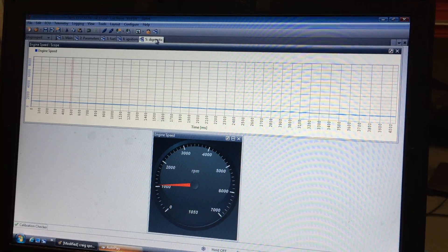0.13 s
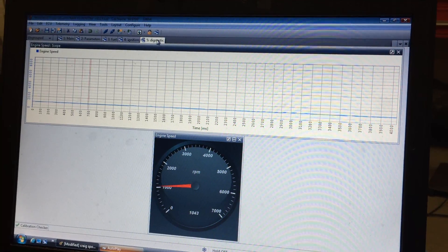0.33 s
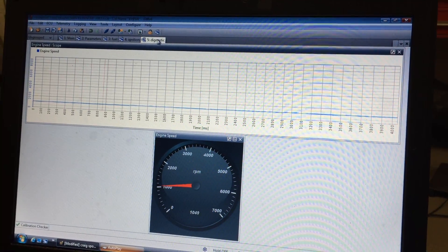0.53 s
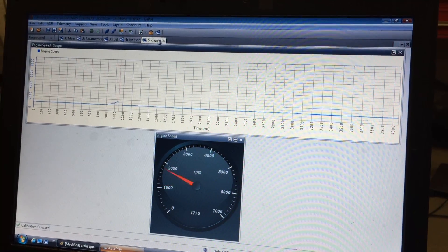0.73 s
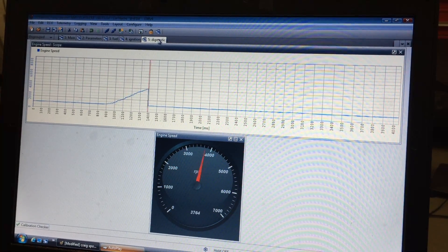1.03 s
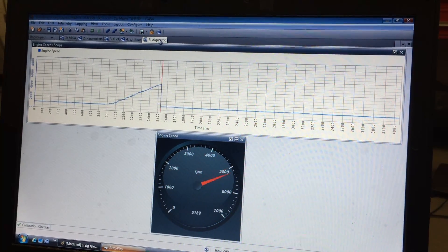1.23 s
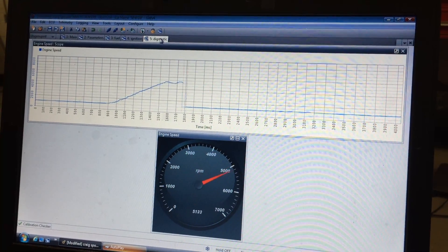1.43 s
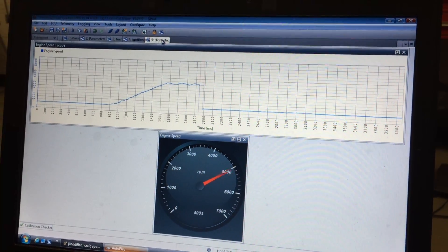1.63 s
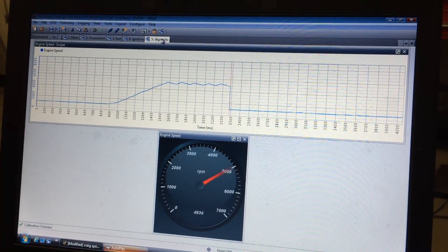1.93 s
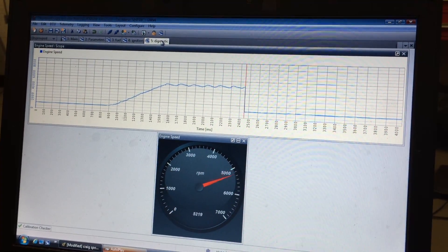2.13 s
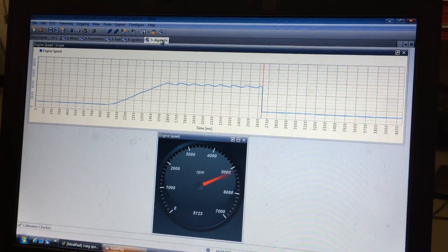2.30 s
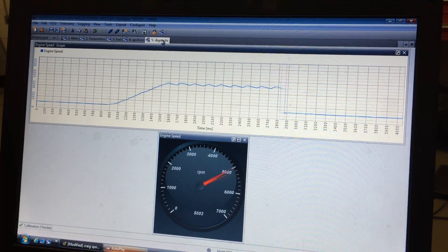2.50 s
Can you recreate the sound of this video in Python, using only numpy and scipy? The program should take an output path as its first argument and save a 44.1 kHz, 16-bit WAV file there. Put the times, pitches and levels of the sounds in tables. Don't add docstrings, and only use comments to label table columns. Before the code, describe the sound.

Car engine on a bench idles briefly, climbs to a howling roar, and bounces rapidly off the limiter.

```python
import sys
import numpy as np
from scipy import signal
from scipy.fft import rfft, irfft, next_fast_len
from scipy.io import wavfile
from scipy.ndimage import uniform_filter1d

SR = 44100
rng = np.random.default_rng(int(sys.argv[2]) if len(sys.argv) > 2 else 0)


def persist_wave(psi):
    counts = np.round(np.clip(psi, -1, 1) * 32767).astype(np.int16)
    wavfile.write(sys.argv[1], SR, np.atleast_2d(counts).T)


def invert_db(x):
    u = np.asarray(x, float) / 20
    return 10 ** u


N = 117306

# (time [s], firing rate [Hz], firing strength [dB], pipe roar [dB], clatter [dB])
ENGINE_RUN = [(.09, 35.97, -26, -47, -38), (.4, 35.55, -27, -66, -39), (.47, 34.86, -30, -49.5, -39),
              (0.551, 35.31, -27.5, -64, -37), (0.646, 35.11, -26.5, -33.5, -38.5),
              (0.689, 40, -23.5, -31.5, -36), (.755, 51.96, -16.5, -26, -38.5),
              (0.811, 60.97, -24, -26, -37.5), (0.865, 71.57, -16, -26, -38),
              (0.931, 85.2, -22.5, -22, -39), (1.019, 112.7, -14.5, -25, -38.5),
              (1.07, 123.7, -22.5, -30.5, -40.5), (1.107, 132.7, -17.5, -19, -37),
              (1.182, 145.4, -19, -30.5, -35), (1.262, 162, -16.5, -29, -34),
              (1.33, 170, -13, -23.5, -33.5), (1.422, 171, -15.5, -24.5, -32.5),
              (2.66, 171, -17, -24.5, -33)]
# (centre time [s], length [s], level [dB])
LIMITER_BURSTS = [
    (1.304, .05, -2),
    (1.406, 0.079, -1),
    (1.554, 0.073, 0),
    (1.709, .08, -0.5),
    (1.862, 0.091, -1.5),
    (2.007, 0.08, 0),
    (2.157, .07, 0),
    (2.301, .075, -2),
    (2.453, 0.1, -0.5),
    (2.595, .08, 0.5),
]
# (frequency [Hz], width [Hz], level [dB])
PIPE_MODES = [(53.3, 5.3, -4), (75.6, 6.9, 5.5), (122.6, 25, 4), (177.7, 23.7, 10), (215.4, 9.6, 14),
              (290, 8.3, -4), (345.2, 37, -13.5), (370.5, 72, -8), (509, 12, 6), (544, 9.9, 8.5),
              (543, 45, -5), (623, 20, -4.5)]
# (frequency [Hz], width [Hz], level [dB])
ROAR_MODES = [(541.5, 21, 10.5), (566.6, 54, 5), (640, 53, 1.5), (497, 75, 3.5), (798, 150, -15),
              (1080, 30, -24.5), (1130, 51, -11), (1453, 72, 0), (2356, 220, -13)]
# (frequency [Hz], width [Hz], level re firing strength [dB])
RUMBLE_MODES = [(50.5, 43, -22.5), (69.4, 54, -9.5), (124.3, 37, -4.5), (173, 36, -7.5), (224.4, 12, -1),
                (324, 37, -10.5), (394, 41, -13.5)]
# (time [s], level [dB])
RASP_EVENTS = [(.74, -27.5), (.84, -31), (.889, -42), (.98, -40), (1.101, -31), (1.331, -20), (1.474, -19),
               (1.62, -24), (1.765, -21.5), (1.946, -28), (2.07, -25), (2.209, -24), (2.36, -22),
               (2.514, -24)]
# (frequency [Hz], density [dB per Hz])
IDLE_CLATTER = [(150, -43), (250, -4), (297, -30.5), (574, -13), (771, -15), (1030, -16.5), (1370, -18.5),
                (2730, -23.5), (15700, -50.5)]
# (frequency [Hz], density [dB per Hz])
FAST_CLATTER = [(410, -60), (700, -4.5), (1260, -5), (1490, -2.5), (1830, -6), (2320, -7), (2890, -11.5),
                (6310, -17.5), (15700, -31)]
# (frequency [Hz], gain [dB])
MIC_RESPONSE = [(3600, -0.5), (4300, 1), (4950, -1.5), (5600, 1), (9600, 1), (10500, 0), (11400, 3),
                (15000, 3)]

T = np.arange(N) / SR


def engine_run():
    limit_s, edge_s = 1.3, .035
    bounce_hz, bounce_lag_s, jitter = 3.5, .035, .003
    times, *columns = np.transpose(ENGINE_RUN)
    rate, fire_db, roar_db, clatter_db = (np.interp(T, times, column) for column in columns)
    fuel_on = np.zeros(N)
    for centre, length, db in LIMITER_BURSTS:
        fuel_on += invert_db(db) * np.clip((length / 2 - abs(T - centre)) / edge_s + .5, 0, 1)
    before_limit = np.clip((limit_s - .04 - T) / edge_s, 0, 1)
    fuel_on = np.maximum(fuel_on, before_limit)
    lagged = uniform_filter1d(np.interp(T - bounce_lag_s, T, fuel_on), size=SR // 25)
    rate = (rate - bounce_hz * (1 - lagged)) * (1 + jitter * drift(30))
    return rate, np.cumsum(rate) / SR, fuel_on, fire_db, roar_db, clatter_db


def firing_orders(rate, turns, fuel_on, fire_db, roar_db):
    catch_hz, catch_s, cut_db = 9, .04, -15
    pulse_db_per_oct, uneven_db, sub_db = -4, -19, -6.5
    upper_hz, upper_db = 393, 5.5
    muffler_hz, muffler_width_hz, muffler_db = 332, 84, -4.5
    wobble_db, settled = 3, .3
    phase = rng.random(64)
    caught = uniform_filter1d(np.interp(T - catch_s, T, fuel_on), size=SR // 20)
    slip = np.cumsum(catch_hz * (1 - caught)) / SR
    steady = 1 - (1 - settled) * np.clip((rate - 50) / 50, 0, 1)
    tones = np.zeros(N)
    for k in range(1, 64):
        order, whole = k / 4, k % 4 == 0
        hz = order * rate
        upper = np.clip((hz - upper_hz) / 60 + .5, 0, 1)
        db = fire_db + upper * (roar_db + upper_db - fire_db)
        if not whole:
            db = db + uneven_db + sub_db * (k < 4)
        wobble = wobble_db * (steady if whole and k != 8 else 1)
        db = db + pulse_db_per_oct * np.log2(hz / 100) + wobble * drift(20 + k)
        db = db + muffler_db * np.exp(-((hz - muffler_hz) / muffler_width_hz) ** 2)
        cycles = order * turns + phase[k]
        fuel = 1
        if k == 4:
            cycles = cycles - slip
            fuel = invert_db(cut_db) + (1 - invert_db(cut_db)) * fuel_on
        fade = np.clip((900 - hz) / 100, 0, 1)
        tones += fuel * fade * invert_db(db) * np.cos(2 * np.pi * cycles)
    return pipe(tones, PIPE_MODES, flip=0.99)


def exhaust_roar(turns, roar_db):
    puff = .5 + np.exp(-(turns % 1) / 0.17)
    puffs = evened(puff * rng.standard_normal(N))
    return invert_db(roar_db) * evened(pipe(puffs, ROAR_MODES))


def rasps():
    rasp_s, rasp_hz = .006, 1900
    shape = np.zeros(N)
    for start, db in RASP_EVENTS:
        length = rasp_s * np.where(T > start, 1.6, .6)
        shape += invert_db(db) * np.exp(-((T - start) / length) ** 2)
    band = signal.butter(3, [rasp_hz * 0.58, rasp_hz * 1.464], "bandpass", fs=SR, output="sos")
    grains = rng.standard_normal(N) * invert_db(2.5 * drift(600))
    return shape * evened(signal.sosfilt(band, grains))


def howl():
    howl_hz, howl_db, start_s, end_s = 533, -23, 0.757, 1.195
    gate = np.clip((T - start_s) / 0.064, 0, 1) * np.clip((end_s - T) / 0.24, 0, 1)
    cycles = np.cumsum(howl_hz * (1 + .008 * drift(40))) / SR
    return gate * invert_db(howl_db + 1.9 * drift(55)) * np.sqrt(2) * np.cos(2 * np.pi * cycles)


def clatter(rate, clatter_db):
    frames, hz = N // 128 + 5, np.fft.rfftfreq(512, 1 / SR)
    real, imag, patches = rng.standard_normal((frames, 257, 3)).T
    patches = uniform_filter1d(patches, size=6, axis=0)
    patches = evened(uniform_filter1d(patches, size=8, axis=1))
    at = np.clip(np.arange(frames) * 128, 0, N - 1)
    fast = np.clip((rate[at] - 35) / 130, 0, 1)

    def levelled(points):
        db = read(points, hz)
        return (db - 10 * np.log10(np.sum(invert_db(2 * db[hz > 2500]))))[:, None]

    db = levelled(IDLE_CLATTER) * (1 - fast) + levelled(FAST_CLATTER) * fast
    db = db + 0.76 * patches + 0.38 * drift(33)[at]
    noise = signal.istft((real + 1j * imag) * invert_db(db), nperseg=512, noverlap=384)[1][:N]
    return invert_db(clatter_db + 3.5) * noise


def intake():
    open_s, rise_s, shut_s, fall_s = .66, .1, .97, .2
    gate = np.clip((T - open_s) / rise_s, 0, 1) * np.clip((shut_s - T) / fall_s + .5, 0, 1)
    high = signal.butter(2, 7000, "highpass", fs=SR, output="sos")
    air = evened(signal.sosfilt(high, rng.standard_normal(N)))
    return invert_db(-44.5 + 1.4 * drift(40)) * gate * air


def rumble(rate, fire_db):
    db = 3.5 + fire_db - 5 * np.log2(rate / 70)
    return invert_db(db) * pipe(10 * rng.standard_normal(N), RUMBLE_MODES)


def pipe(x, modes, flip=-1):
    out = np.zeros(N)
    for k, (hz, width, db) in enumerate(modes):
        r = np.exp(-np.pi * width / SR)
        ring = signal.lfilter([1 - r], [1, -r * np.exp(2j * np.pi * hz / SR)], x)
        out += flip ** k * invert_db(db) * 2 * ring.real
    return out


def drift(rate_hz):
    size = max(int(SR / rate_hz), 2)
    smooth = uniform_filter1d(rng.standard_normal(N), size)
    return evened(uniform_filter1d(smooth, size))


def evened(x):
    return x / np.sqrt(np.mean(x ** 2) + 1e-20)


def read(points, hz):
    f, value = np.transpose(points)
    return np.interp(np.log(hz + 1), np.log(f + 1), value)


def scene():
    rate, turns, fuel_on, fire_db, roar_db, clatter_db = engine_run()
    exhaust = firing_orders(rate, turns, fuel_on, fire_db, roar_db) + exhaust_roar(turns, roar_db)
    mechanical = clatter(rate, clatter_db) + rumble(rate, fire_db)
    return (exhaust + rasps() + howl() + mechanical + intake())[None]


def roll_off(x):
    return signal.sosfilt(signal.butter(12, 15860, fs=SR, output="sos"), x)


def record(dry):
    start_s, edge_hz = .0845, 15730
    begun = dry * np.clip((T - start_s) / 0.0022, 0, 1)
    low_cut = signal.butter(5, 41, "highpass", fs=SR, output="sos")
    low = signal.sosfilt(low_cut, begun)
    size = next_fast_len(N + 4096)
    hz = np.fft.rfftfreq(size, 1 / SR)
    edge_db = -70 * np.clip((hz - edge_hz) / 120, 0, 1)
    gain = invert_db(read(MIC_RESPONSE, hz) + edge_db)
    mix = irfft(rfft(low, size) * gain, size)[:, :N]
    return roll_off(mix)


dry = scene()
out = record(dry)
persist_wave(out)
```